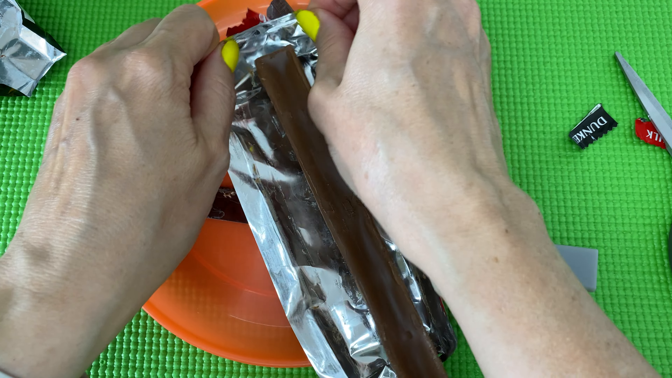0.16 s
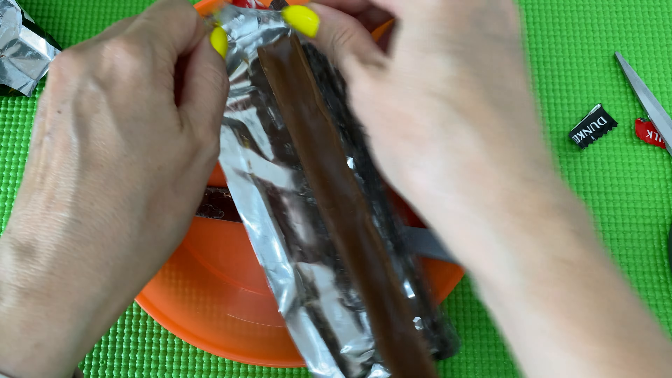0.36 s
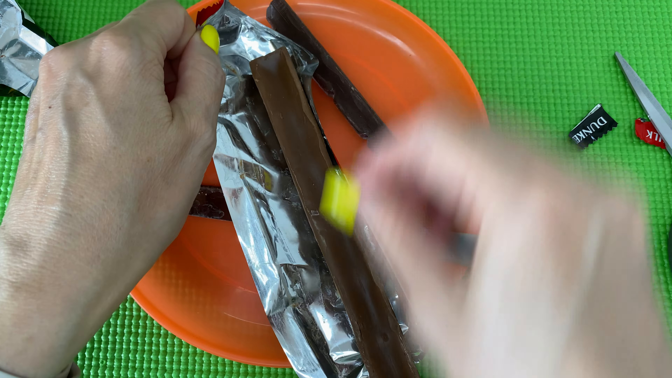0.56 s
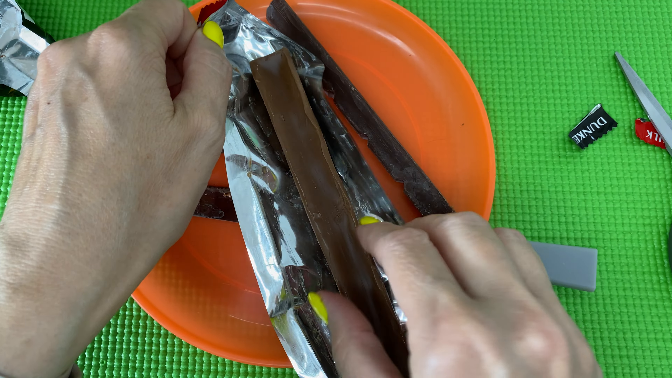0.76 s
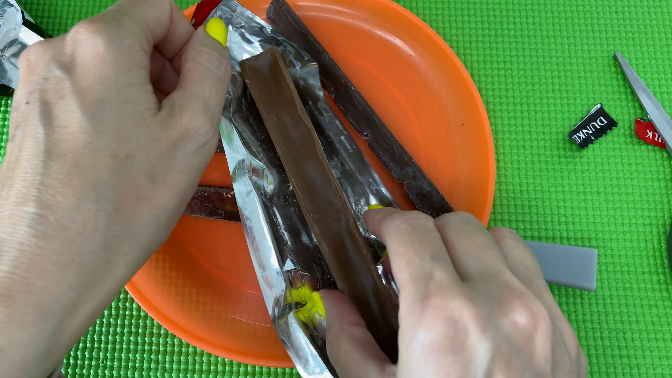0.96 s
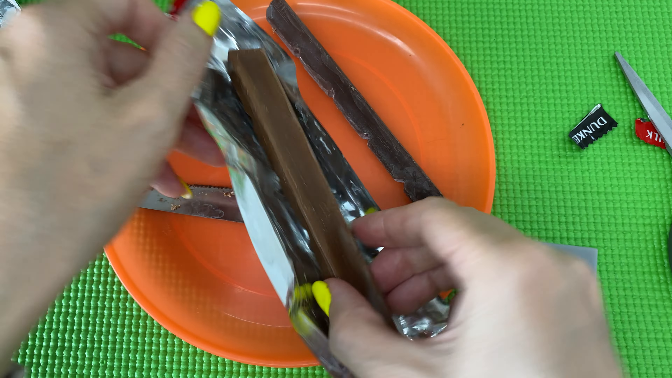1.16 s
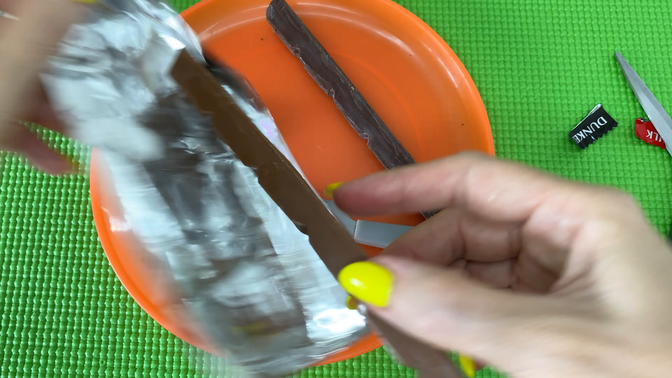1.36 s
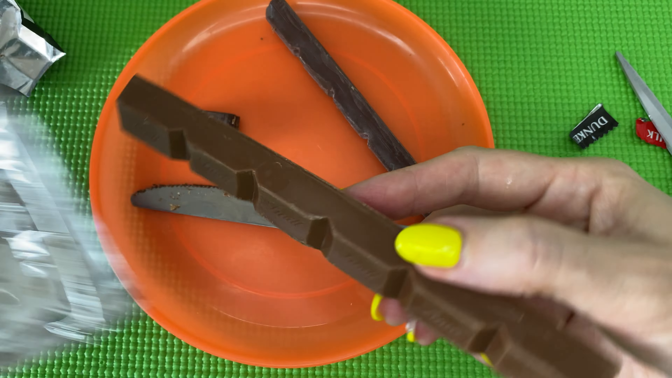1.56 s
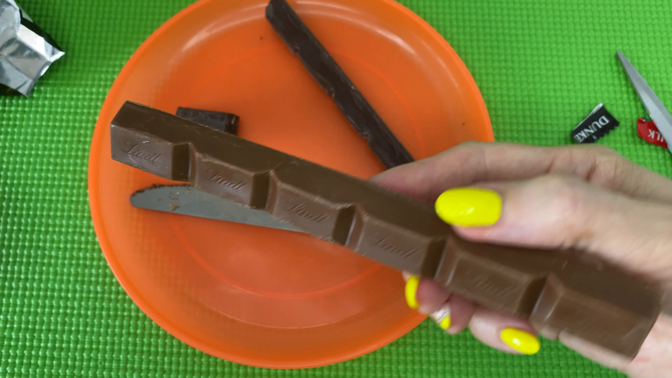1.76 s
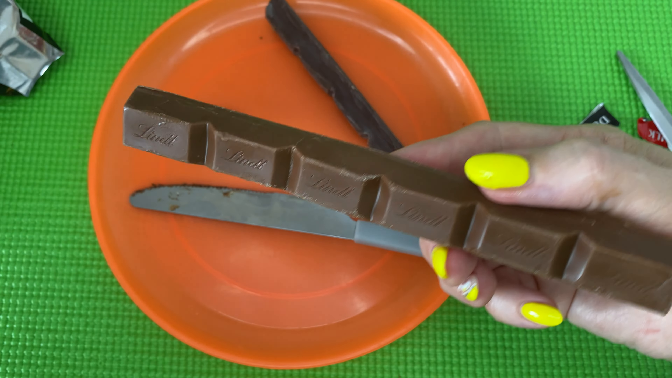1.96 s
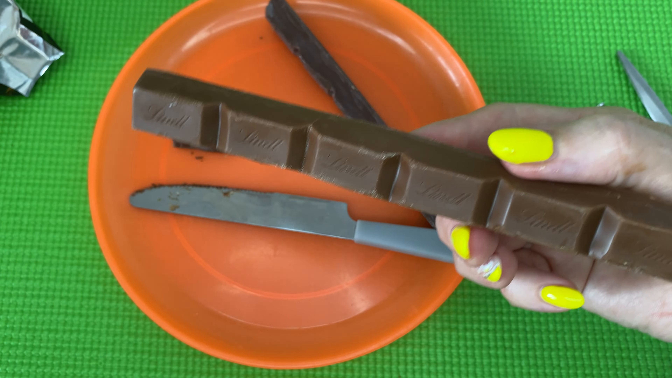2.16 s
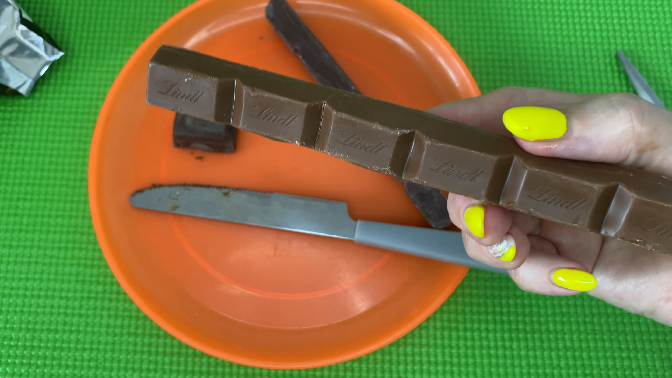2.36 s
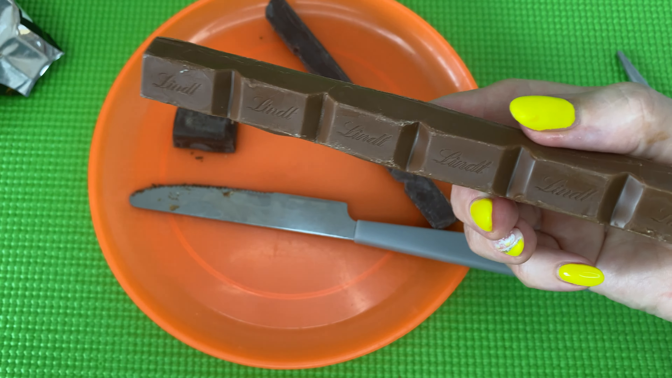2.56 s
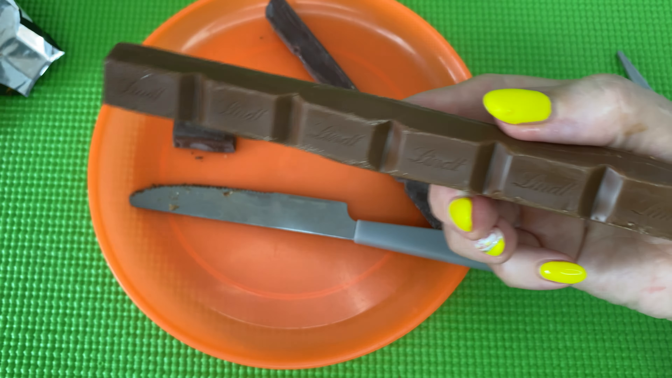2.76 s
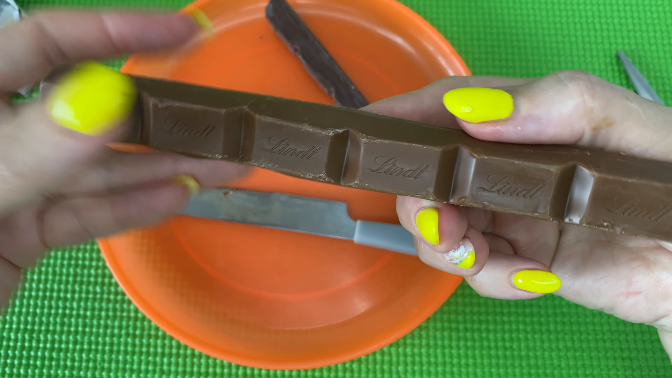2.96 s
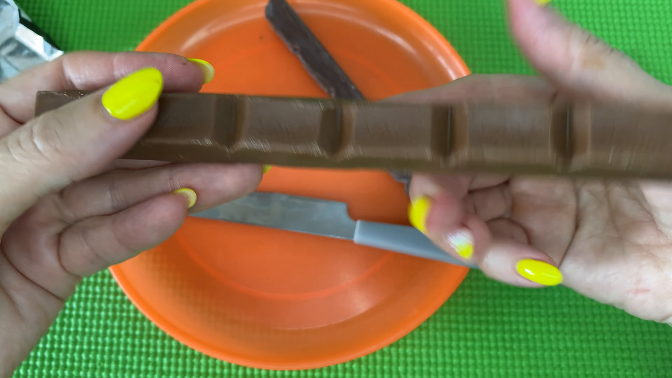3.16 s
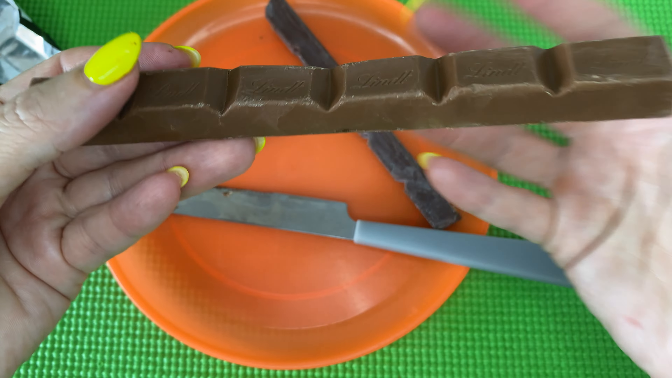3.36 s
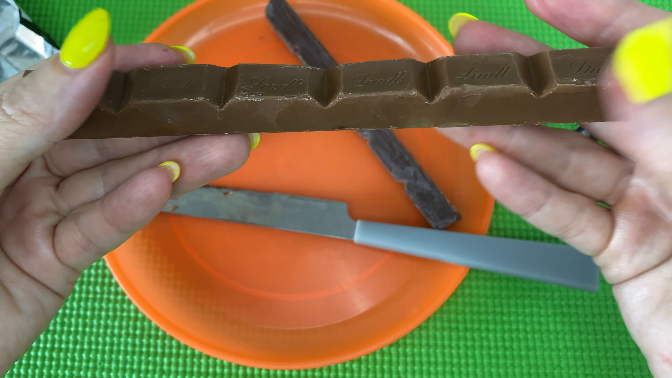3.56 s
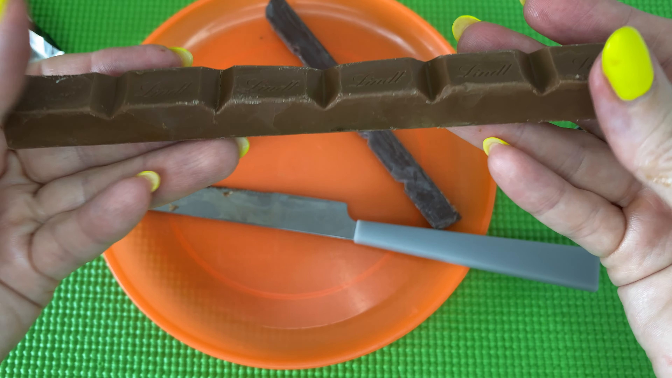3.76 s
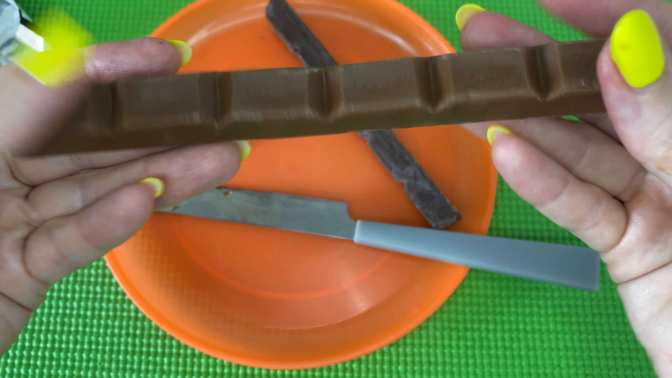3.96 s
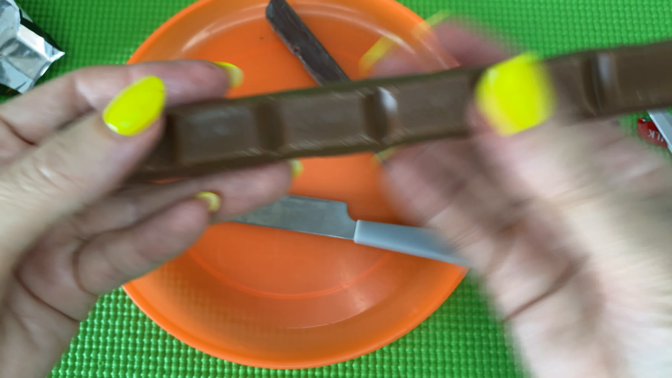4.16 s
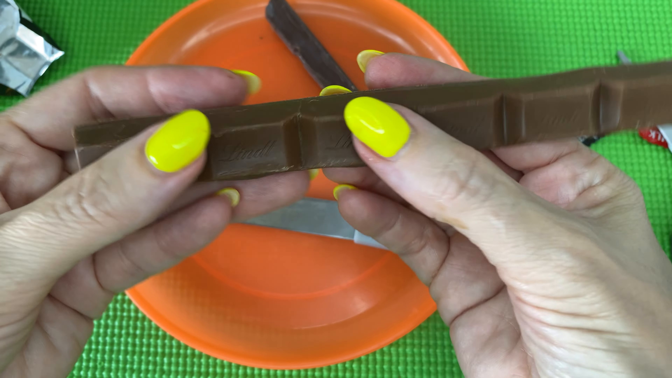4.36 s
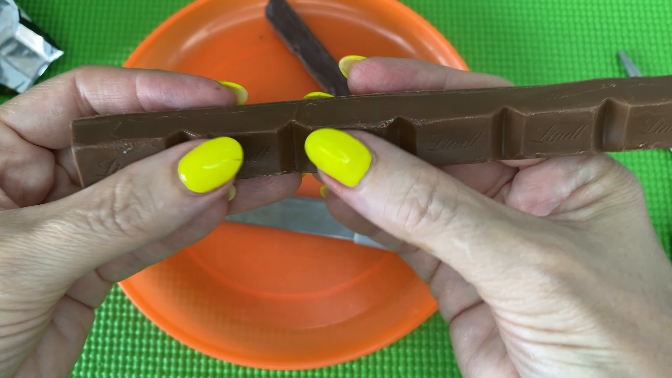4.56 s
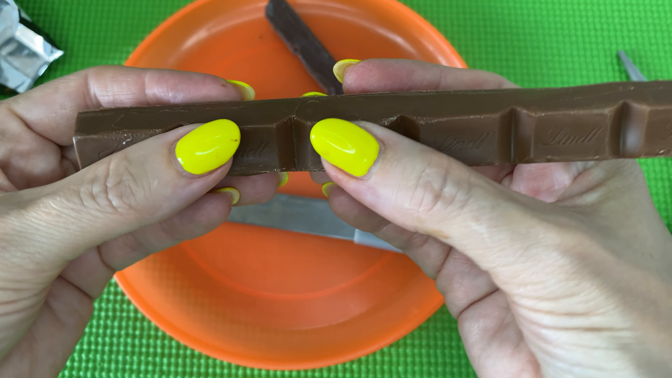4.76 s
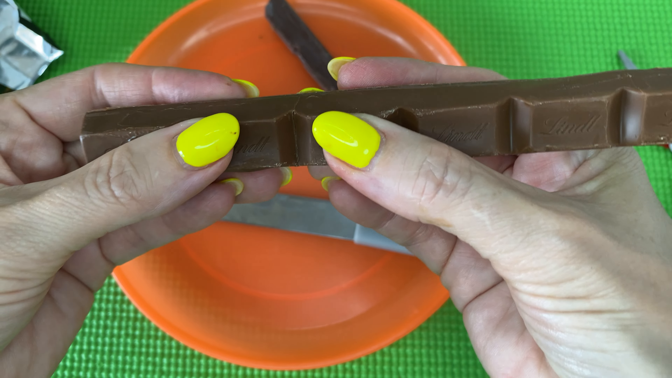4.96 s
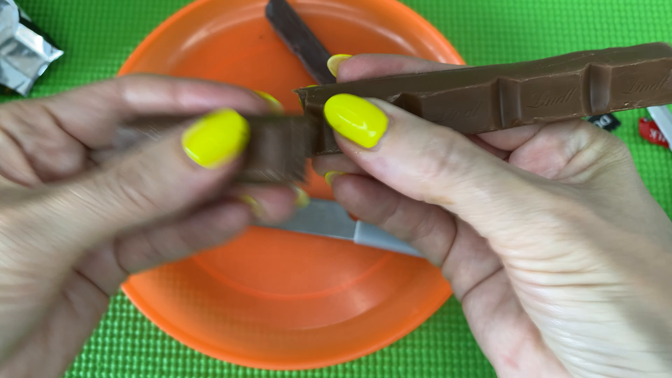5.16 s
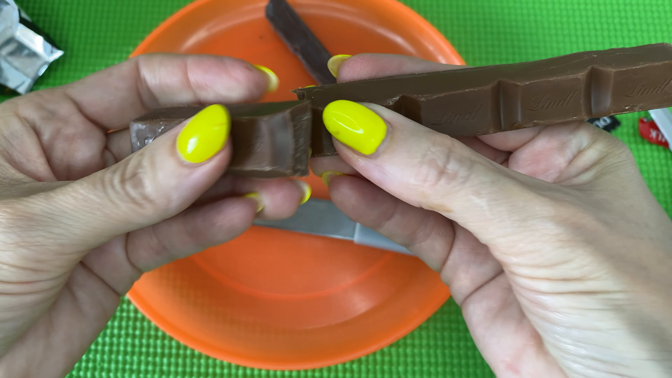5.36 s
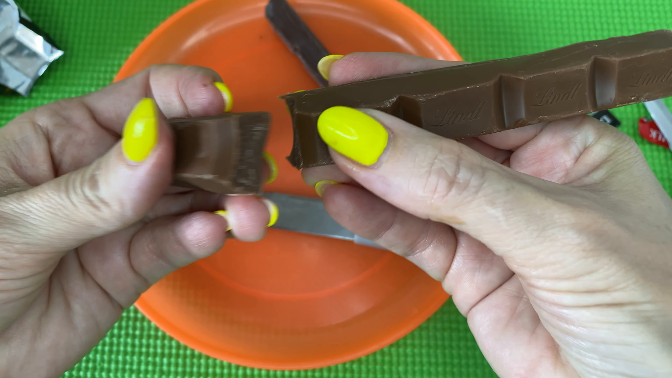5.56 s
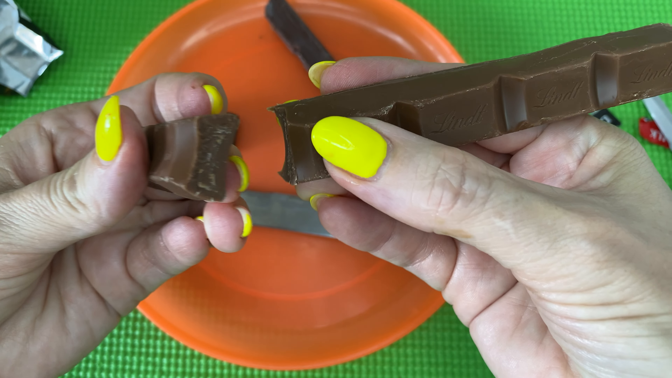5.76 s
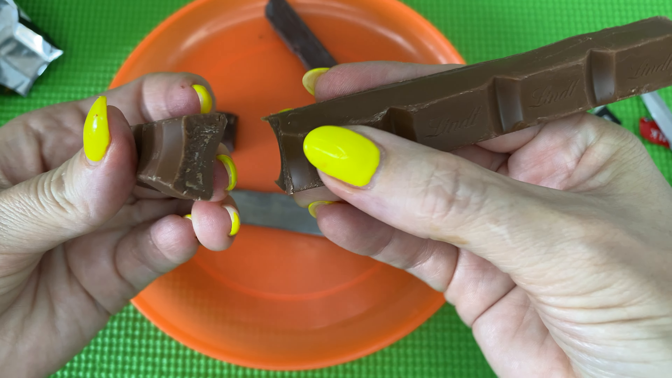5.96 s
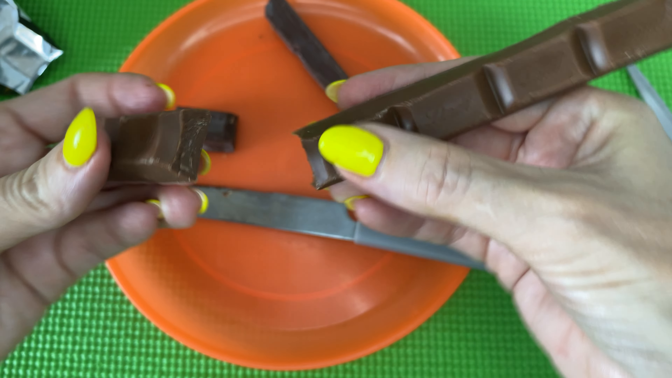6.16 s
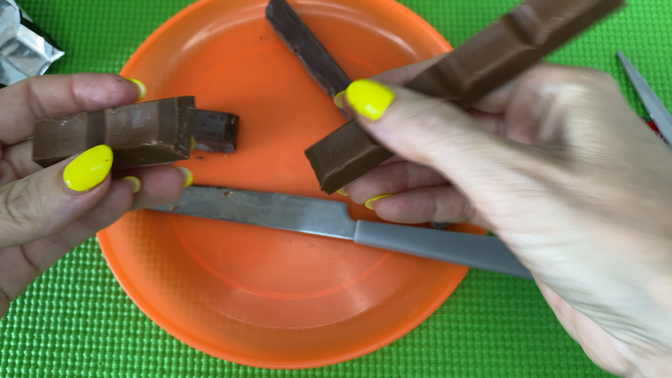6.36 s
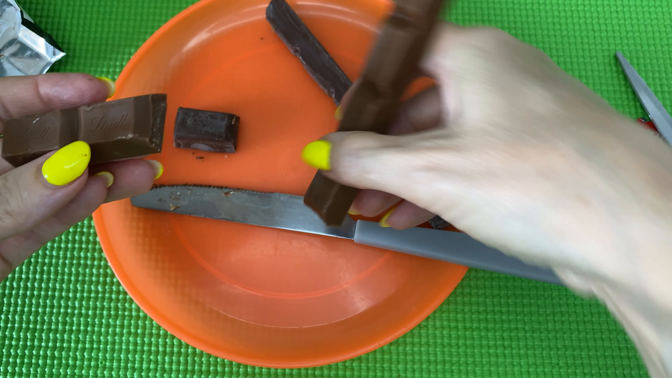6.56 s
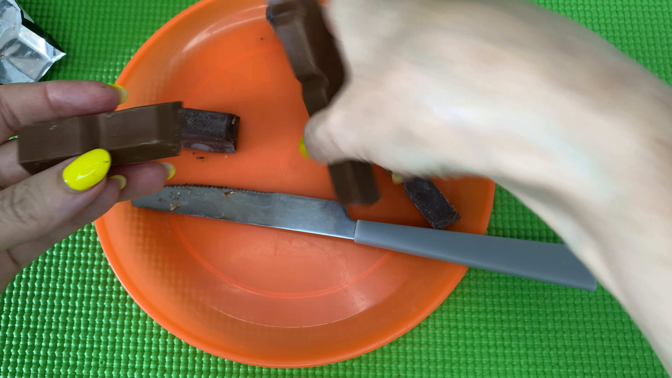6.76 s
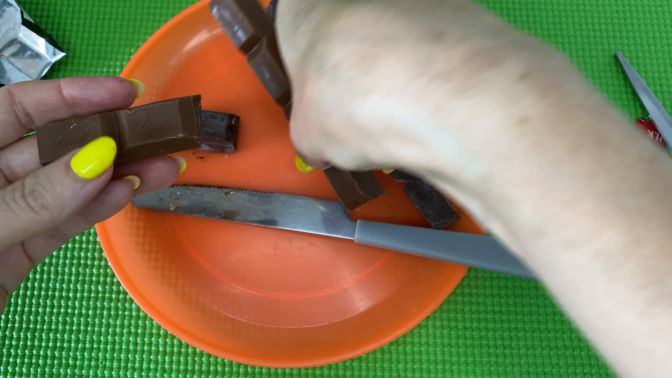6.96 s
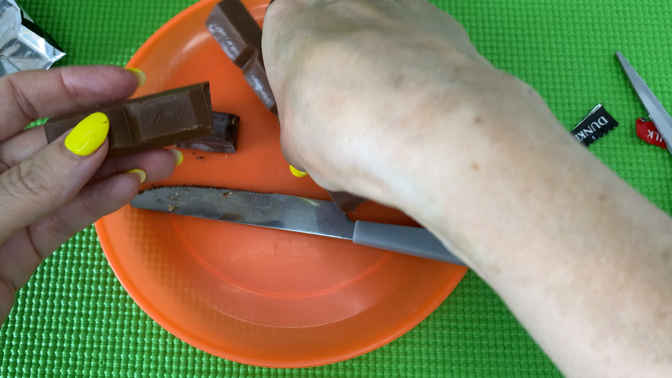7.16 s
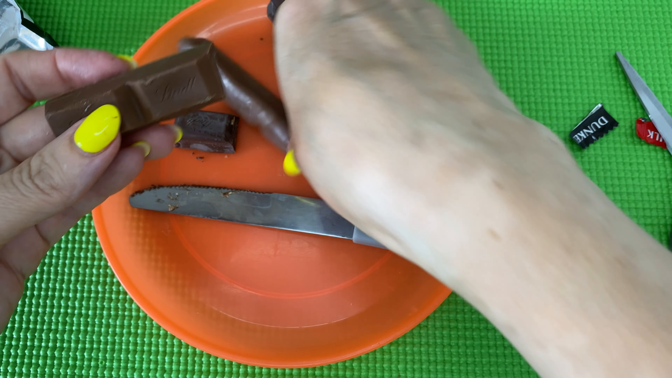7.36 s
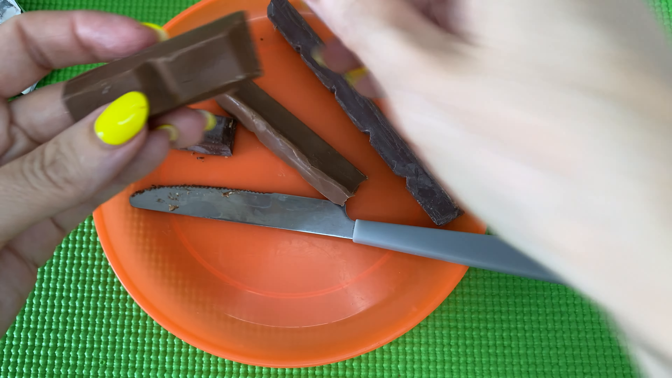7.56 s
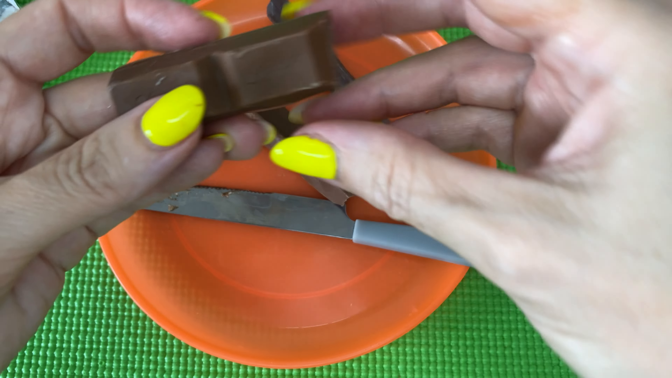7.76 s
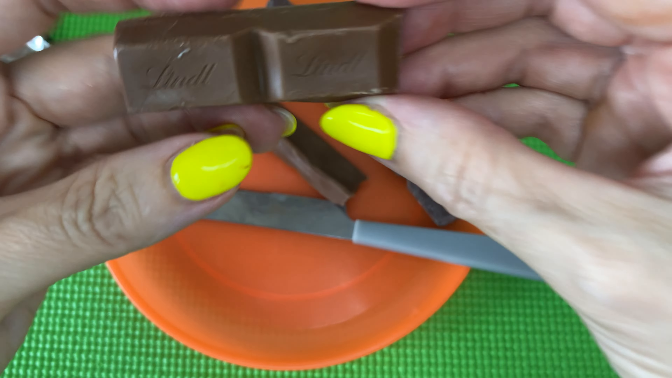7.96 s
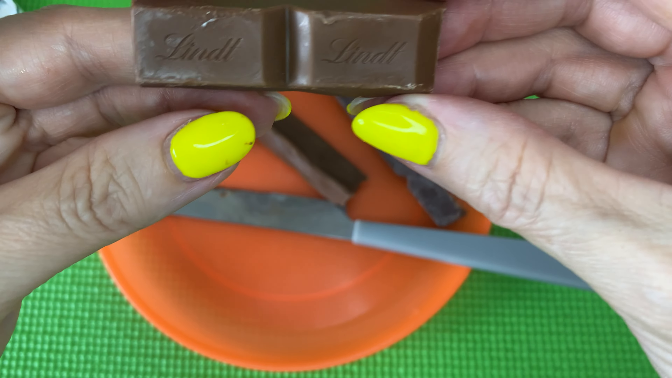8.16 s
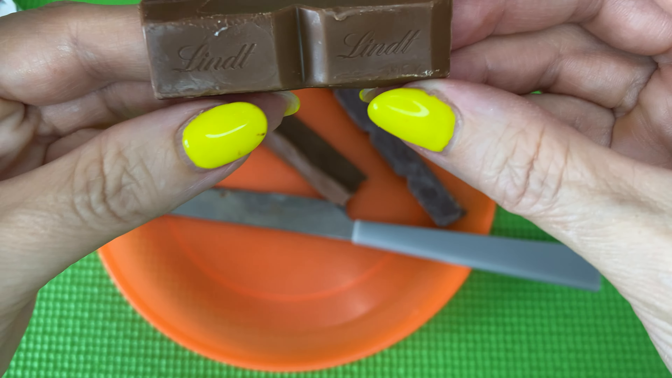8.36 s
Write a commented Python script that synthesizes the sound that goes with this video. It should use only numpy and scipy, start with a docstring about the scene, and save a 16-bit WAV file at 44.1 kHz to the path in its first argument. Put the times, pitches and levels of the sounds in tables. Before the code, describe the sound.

Foil pops and rustles at once, loud, dense and crisp, with brief gaps, then thins to occasional light crinkles. Near silence follows: low room hiss, wavering rumble, barely audible skin on chocolate. Midway comes a small crisp break with skin scuffs. Near the end a light tap precedes a rapid clatter of a bar settling on a thin plastic plate. Close phone pickup, short room tail.

```python
"""In a small furnished room, hands close to a phone peel a foil wrapper off a chocolate bar.
They turn the bar, snap a piece off and lay the rest on a plastic plate, where it rattles to rest.
Each buckling crease is a few-cycle pop with a bright spit of noise; filtered grains make the rustle and crumbs.
Damped modes ring the plate, swells of noise rub skin on chocolate, and low damped swings jolt the table.
The room adds a diffuse tail to foil, bar and plate, over steady hiss and a rumble that swells and wavers."""
import sys
import numpy as np
from scipy import signal
from scipy.fft import rfft, irfft
from scipy.io import wavfile

SR = 44100
rng = np.random.default_rng(int(sys.argv[2]) if len(sys.argv) > 2 else 0)


def inscribe(sig):
    """Save sig as 16-bit PCM at rate SR to the path in sys.argv[1].

    A 1-D sig is mono; a 2-D sig holds one channel per row.
    Samples are clipped to [-1, 1] before scaling.
    """
    pcm = np.round(np.clip(np.atleast_2d(sig).T, -1, 1) * 32767)
    wavfile.write(sys.argv[1], SR, pcm.astype(np.int16))


N = 370649


def undb(db):
    """Amplitude ratio: 20 dB is a factor of ten."""
    return 10 ** (np.asarray(db) / 20)


def unit(x):
    """Normalization to an rms of 1."""
    return x / np.sqrt(np.mean(x ** 2))


def noise(count=N):
    """White noise: equal power at all frequencies on average."""
    return rng.standard_normal(count)


def band(x, low_hz, high_hz):
    """Band-pass filtering: only the range between two cutoffs is passed."""
    edges_hz = [low_hz, min(high_hz, .45 * SR)]
    return signal.sosfilt(signal.butter(2, edges_hz, "band", fs=SR, output="sos"), x)


def add(out, start_s, x):
    """Superposition: x is summed into out from its start time."""
    i = int(start_s * SR)
    out[i:i + len(x)] += x[:N - i]


def level_curve(rows):
    """Level interpolated in dB between the points of a table, silent outside them."""
    start_s, level_db = np.transpose(rows)
    return undb(np.interp(np.arange(N) / SR, start_s, level_db, left=-200, right=-200))


def pops(rows, cycles, sweep_db, buzz_db, buzz_ms, spit_ms, linger_db, linger_ms):
    """Buckling impulse: a damped swing, a dispersive falling sweep, a noisy buzz and a bright spit."""
    out, t = np.zeros(N), np.arange(1500) / SR
    for start_s, pop_db, pitch_hz, spit_db in rows:
        buzz_noise, spit_noise = noise(len(t)), noise(len(t))
        side = np.sign(buzz_noise[0])  # random polarity
        age = t * pitch_hz / cycles  # the swing's envelope peaks at age 1
        swing = age * np.exp(1 - age) * np.sin(2 * np.pi * pitch_hz * t)

        # slow bending waves arrive later, so the pitch falls; large, low patches show it most
        phase = 2 * np.pi * 2.2 * pitch_hz * .0005 * np.log(1 + t / .0005)
        sweep = undb(sweep_db) * 1600 / pitch_hz * np.sin(phase) * np.exp(-t / .0016)

        buzz = undb(buzz_db) * unit(band(buzz_noise, 0.3 * pitch_hz, 2.0 * pitch_hz))
        buzz = buzz * np.exp(-t * 1000 / buzz_ms) * np.minimum(age, 1)

        # the spit decays in two stages, quick and lingering
        fade = np.exp(-t * 1000 / spit_ms) + undb(linger_db) * np.exp(-t * 1000 / linger_ms)
        spit = fade * unit(band(spit_noise, 5800, 14000))
        add(out, start_s, undb(pop_db) * (side * (swing + sweep) + buzz) + undb(spit_db) * spit)
    return out


def grains(rate_per_s, scatter_db, low_hz, high_hz, smear_ms):
    """Shot noise: sparse random ticks of uneven size, each decaying exponentially in one band."""
    when, size = rng.random((2, N))
    heights = undb(scatter_db * np.minimum(-np.log(size + 1e-9), 3.5))
    ticks = (when < rate_per_s / SR) * heights
    fading = signal.lfilter([1], [1, -np.exp(-1000 / (smear_ms * SR))], ticks)
    return unit(band(fading * noise(), low_hz, high_hz))


# the clearest creases of the buckling foil: start_s [s], pop_db [dB], pitch_hz [Hz], spit_db [dB]
CLEAR_CREASES = [(0.0575, -16, 2610, -28), (0.0934, -5.5, 4810, -11), (0.1137, -10, 3360, -33),
                 (0.1255, -20.5, 2940, -31), (0.1316, -18.5, 1676, -39), (0.1839, -8.5, 2700, -26),
                 (0.1871, -6, 3510, -10.5), (0.2259, -24, 3170, -27), (0.2373, -27, 2520, -38),
                 (0.2817, -25, 3470, -60), (0.3018, -24, 4500, -30.5), (0.3049, -21.5, 2640, -44),
                 (0.32, -33.5, 1340, -32), (0.3274, -24, 2720, -57), (0.3458, -22.5, 2710, -33),
                 (0.3725, -27, 2470, -46), (0.3777, -10.5, 5750, -40), (0.3838, -12, 2275, -14),
                 (0.3877, -7.5, 4460, -9.5), (0.4145, -23, 2700, -44), (0.4305, -22, 4350, -35),
                 (0.4396, -15.5, 3280, -39), (0.4447, -13.5, 3910, -32), (0.4538, -10, 2750, -11.5),
                 (0.6772, -36.5, 3210, -57), (0.6883, -44.5, 990, -35), (0.7099, -26.5, 3500, -30),
                 (0.7427, -20.5, 3190, -23.5), (0.7684, -21, 3830, -19), (0.8087, -24, 4970, -45),
                 (0.8215, -10.5, 3750, -17), (0.8515, -7.5, 6080, -46), (1.0345, -13, 3810, -11),
                 (1.036, -10.5, 4880, -10.5), (1.0676, -21, 2380, -13.5), (1.0841, -21, 5430, -37),
                 (1.094, -20, 5160, -24), (1.0964, -14, 4790, -21), (1.0997, -14.5, 4210, -31),
                 (1.1035, -17, 4770, -35), (1.1148, -21.5, 4730, -37), (1.1342, -31, 2150, -32),
                 (1.1608, -34, 4200, -41), (1.2368, -34.5, 1370, -39), (1.262, -25, 2230, -53),
                 (1.2776, -30.5, 1810, -60), (1.2998, -46.5, 1020, -60), (1.3369, -31, 4270, -64),
                 (1.355, -24, 2210, -44), (1.3734, -31.5, 1540, -55), (1.4079, -33.5, 4140, -32),
                 (1.4099, -35.5, 1310, -39), (1.4247, -26, 1610, -28.5), (1.4385, -25, 3760, -28),
                 (1.4529, -35, 1570, -41), (1.4759, -42, 1450, -41), (1.5028, -28.5, 1580, -44),
                 (1.5147, -31.5, 3050, -57), (1.6397, -32, 3690, -49.5), (1.6498, -47, 1140, -62),
                 (1.9173, -50, 2605, -47), (1.9829, -54, 2720, -59), (2.0303, -51, 3360, -52),
                 (2.0408, -51, 4480, -50), (2.1268, -44, 3760, -59), (2.1455, -52, 5820, -43.5),
                 (2.3493, -40, 3520, -50), (2.359, -45.5, 1640, -41.5), (2.3897, -54, 2855, -52),
                 (2.475, -52, 5340, -59)]


def foil():
    """Snap-through buckling: clear and lesser creases each release a pop and a spit."""
    return pops(CLEAR_CREASES + lesser_creases(), cycles=0.81, sweep_db=1.0, buzz_db=-9.5, buzz_ms=2.2,
                spit_ms=0.55, linger_db=-17, linger_ms=4.9)


# how hard the foil is worked, one list for each spell of handling: start_s [s], level_db [dB]
HANDLING = [
    [(0, -43.5), (.09, -48.5), (.17, -50), (.27, -67), (.31, -51), (.42, -42), (.52, -54), (.56, -71)],
    [(.65, -78.5), (.68, -52.5), (.75, -47), (.8, -59.5), (1.03, -55), (1.08, -44), (1.19, -53.5),
     (1.31, -59), (1.5, -55.5), (1.55, -73), (1.6, -77), (1.635, -62), (1.72, -78)],
    [(1.9, -74.5), (1.93, -62.5), (2.0, -75), (2.045, -64), (2.085, -72.5), (2.14, -62), (2.2, -81.5),
     (2.28, -68.5), (2.33, -71.5), (2.4, -64), (2.45, -75.5), (2.55, -85)],
]
LESSER_PER_S = 45  # chance creases
LESSER_DB, LESSER_SCATTER_DB = 10.5, 0.5  # over the handling level, and scale of the random excess
LESSER_HZ, LESSER_OCTAVES = 2660, 0.72  # usual pitch and its spread
LESSER_SPIT_DB, SPIT_SPREAD_DB = -9.5, 5.0  # spit relative to the pop
SHEEN_DB = -4  # treble of the rustle relative to its body


def lesser_creases():
    """Random point process: small pops at chance moments, scaled by how hard the foil is worked."""
    rows = []
    window_s = 1.5  # draws past the end of a spell are dropped
    count = int(LESSER_PER_S * window_s)
    for spell in HANDLING:
        spell_s, spell_db = np.transpose(spell)
        when, size = rng.random((count, 2)).T
        pitch, spit = rng.standard_normal((count, 2)).T
        start_s = spell_s[0] + window_s * when
        excess_db = LESSER_DB - LESSER_SCATTER_DB * np.log(size + 0.025)
        pop_db = np.interp(start_s, spell_s, spell_db) + excess_db
        pitch_hz = np.clip(LESSER_HZ * 2 ** (LESSER_OCTAVES * pitch), 900, 6000)
        spit_db = pop_db + LESSER_SPIT_DB + SPIT_SPREAD_DB * spit
        creases = np.transpose([start_s, pop_db, pitch_hz, spit_db])
        rows += list(creases[start_s < spell_s[-1]])
    return rows


def rustle():
    """Crackling noise: many tiny creases fuse, in patches of foil of several sizes."""
    body = (0.27 * grains(120.2, 3.6, 200, 520, 3.8)
            + .5 * grains(200, 3.087, 900, 1655, 2.1)
            + grains(400, 3., 1500, 3600, 2.)
            + .7 * grains(600, 2.5, 3400, 6500, 2.))
    sheen = grains(900, 2.5, 6000, 14000, 2.)
    effort = sum(level_curve(spell) for spell in HANDLING)
    return effort * (unit(body) + undb(SHEEN_DB) * sheen)


# nails ticking on the bar, the snap, the bar touching the plate:
# start_s [s], pop_db [dB], pitch_hz [Hz], spit_db [dB]
BAR_TICKS = [(3.5281, -56, 4500, -64.5), (4.9445, -57, 3965, -49.5), (5.0764, -60.5, 3940, -62),
             (5.112, -60, 3700, -72), (5.1333, -39.5, 2980, -38.5), (5.1355, -38, 2870, -44),
             (5.1382, -32.5, 2840, -32.5), (7.1332, -57.5, 1460, -62.5), (7.1705, -40, 1727, -57.5),
             (7.1807, -52.5, 2072, -73.5)]


def bar():
    """Impact and brittle fracture: short pops for the ticks, the snap and the first touch of the plate."""
    return pops(BAR_TICKS, cycles=1.254, sweep_db=-24.0, buzz_db=-7, buzz_ms=2.95,
                spit_ms=1.04, linger_db=-45.0, linger_ms=10.0)


# the bar dropped on the plate, rattling to rest: start_s [s], pop_db [dB], spit_db [dB]
DROP_KNOCKS = [(7.3521, -13.5, -32.5), (7.3549, -26, -30), (7.358, -17, -26.5), (7.3605, -20, -32),
               (7.3709, -14.5, -25), (7.3753, -14.5, -25), (7.3808, -10, -10), (7.3875, -23, -35),
               (7.3924, -16.5, -33.5), (7.3963, -26, -29), (7.4045, -25, -39), (7.4095, -29, -46)]
DROP_HZ, DROP_OCTAVES = 1790, .16  # pitch of the knocks and its spread


def drop():
    """Repeated impact: the bar strikes the plate in a quick run of knocks of slightly varied pitch."""
    rows = []
    for start_s, pop_db, spit_db in DROP_KNOCKS:
        pitch_hz = DROP_HZ * 2 ** (DROP_OCTAVES * rng.standard_normal())
        rows.append((start_s, pop_db, pitch_hz, spit_db))
    return pops(rows, cycles=0.95, sweep_db=-9, buzz_db=-2.5, buzz_ms=1.96,
                spit_ms=0.2, linger_db=-18.0, linger_ms=4.2)


# ringing modes of the plate: pitch_hz [Hz], level_db [relative dB], t60_s [s]
PLATE_MODES = [(1473, -19, 0.042), (1721, -6.5, 0.045), (2060, -9, 0.04), (2487, -7.5, 0.056),
               (3100, -1.5, 0.059)]
RING_DB, RATTLE_DB = -44.5, -44.5  # gains on the ringing and on the rattle


def plate(blows):
    """Modal resonance: blows ring damped modes, and stored energy drives a broad, dying rattle."""
    t = np.arange(8000) / SR
    ring = sum(undb(level_db) * np.sin(2 * np.pi * pitch_hz * t) * 1000. ** (-t / t60_s)
               for pitch_hz, level_db, t60_s in PLATE_MODES)
    blows = band(blows, 860, 17400)  # a small plate radiates little bass
    stored = signal.lfilter([1], [1, -np.exp(-1 / (0.018 * SR))], blows ** 2)  # energy left in the plate
    low_rattle = unit(band(noise(), 270.0, 870))
    high_rattle = unit(band(noise(), 1900, 5840))
    rattle = np.sqrt(stored) * unit(0.65 * low_rattle + high_rattle)
    ringing = signal.fftconvolve(blows, ring)[:N]
    return blows + undb(RING_DB) * ringing + undb(RATTLE_DB) * rattle


CRUMBLE_S, CRUMBLE_DB, CRUMBLE_FADE_S = 5.14, -60, 0.046  # start, level, time constant


def crumble():
    """Granular noise: fine grains of crumbs falling after the snap, fading exponentially."""
    age = np.arange(N) / SR - CRUMBLE_S
    fade = (age > 0) * np.exp(-np.abs(age) / CRUMBLE_FADE_S)
    crumbs = grains(900, 2.1, 2400, 6100, 2.) + undb(-6.5) * grains(900, 2.5, 8500, 14000, 2.)
    return undb(CRUMBLE_DB) * fade * crumbs


# fingertips sliding on the bar, a thin high hiss: middle_s [s], level_db [dB], length_s [s]
FINGER_SLIDES = [(3.271, -79, 0.02), (3.362, -77.5, 0.051), (4.39, -75, 0.11), (4.67, -71, 0.058),
                 (5.25, -70, 0.035), (5.37, -73.5, 0.043), (8.15, -82, .04)]
# skin catching on the bar, a short low scuff: middle_s [s], level_db [dB], length_s [s]
SKIN_SCUFFS = [(3.836, -74.5, 0.021), (5.272, -66, 0.0077), (5.288, -65.5, 0.013), (5.315, -77.5, 0.065)]
SLIDE_HZ, SCUFF_HZ = 11600, 1840


def rubs(rows, center_hz):
    """Friction noise: bell-shaped swells of hiss, relatively broader in band when high."""
    t, spread = np.arange(N) / SR, 1.05 + center_hz / 36000
    swells = sum(undb(level_db) * np.exp(-(2 * (t - middle_s) / length_s) ** 2)
                 for middle_s, level_db, length_s in rows)
    return swells * unit(band(noise(), center_hz / spread, center_hz * spread))


# dull jolts through hands and table, each with a higher knock on top:
# start_s [s], level_db [dB], pitch_hz [Hz], t60_s [s], knock_db [dB]
TABLE_JOLTS = [(0.111, -48, 153, 0.029, -35), (0.39, -40, 175, 0.032, -42), (0.455, -36.5, 151, 0.054, -45),
               (2.362, -46, 177, 0.12, -44.5), (5.141, -30.5, 125.4, 0.03, -46.5),
               (7.357, -29.5, 132, 0.1, -36), (7.38, -38, 202, 0.21, -45)]
OVERTONE, OVERTONE_T60_S = 2.4, 0.022  # knock pitch over swing pitch, knock decay


def jolts():
    """Damped oscillation: a low swing starts softly and dies quickly under a short knock."""
    out, t = np.zeros(N), np.arange(8000) / SR
    for start_s, level_db, pitch_hz, t60_s, knock_db in TABLE_JOLTS:
        onset = np.minimum(t * pitch_hz, 1)  # rises over one cycle
        swing = np.sin(2 * np.pi * pitch_hz * t) * onset * np.exp(-np.log(1000) * t / t60_s)
        knock = np.sin(2 * np.pi * OVERTONE * pitch_hz * t) * np.exp(-np.log(1000) * t / OVERTONE_T60_S)
        add(out, start_s, undb(level_db) * swing + undb(knock_db) * knock)
    return out


# decay of the room by band: low_hz [Hz], high_hz [Hz], level_db [relative dB], t60_s [s]
ROOM_BANDS = [(150.1, 480, 0.5, 0.067), (945, 3500, -17, 0.35), (3500, 4600, -17, 0.24),
              (8000, 20000, -15, 0.2)]


def room(x):
    """Diffuse reverberation: a noise tail builds over a few ms, and each band decays at its own rate."""
    t = np.arange(16000) / SR
    tail = 0
    for low_hz, high_hz, level_db, t60_s in ROOM_BANDS:
        decay = np.exp(-np.log(1000) * t / t60_s) * (1 - np.exp(-t / .004))
        decay = decay / np.sqrt(np.sum(decay ** 2))
        tail = tail + undb(level_db) * band(noise(len(t)), low_hz, high_hz) * decay
    return signal.fftconvolve(x, tail)[:N]


# spectrum of the hiss: pitch_hz [Hz], level_db [relative dB per Hz]
HISS_SPECTRUM = [(120, -31.5), (200, -6), (232, -4.5), (403, -6), (451, -7), (756, -10), (844, -12),
                 (3020, -19.5), (12300, -25), (15000, -32), (16500, -49)]
# level of the deep rumble: start_s [s], level_db [dB]
DEEP_RUMBLE = [(0, -74.5), (1.6, -67), (2.6, -71.5), (3.4, -69.5), (4.7, -75), (5.17, -70.5), (5.27, -53),
               (5.4, -62), (5.52, -57), (6.2, -66.5), (8.41, -69)]
HISS_DB, UPPER_RUMBLE_DB = -72.5, -67.5
WAVER_DB, WAVER_S = 2.73, 0.31  # spread of the random level, time between its points


def floor():
    """Background noise: steady shaped hiss of room and microphone, over a deep rumble
    that swells after the snap and a wavering upper rumble."""
    hz, (pitch_hz, level_db) = np.fft.rfftfreq(N, 1 / SR), np.transpose(HISS_SPECTRUM)
    shape = undb(np.interp(np.log(hz + 1), np.log(pitch_hz), level_db))
    hiss = unit(irfft(rfft(noise()) * shape, N))
    deep = unit(band(band(noise(), 45, 60), 30, 84))
    upper = unit(band(noise(), 64, 160))
    waver = np.interp(np.arange(N) / SR / WAVER_S, np.arange(99), noise(99))
    upper_level = undb(UPPER_RUMBLE_DB + WAVER_DB * waver)
    return undb(HISS_DB) * hiss + level_curve(DEEP_RUMBLE) * deep + upper_level * upper


def scene():
    """Superposition: near sources with their room tail, then the other touches and the floor."""
    near = foil() + rustle() + bar() + plate(drop())
    skin = rubs(FINGER_SLIDES, SLIDE_HZ) + rubs(SKIN_SCUFFS, SCUFF_HZ)
    return (near + room(near) + jolts() + skin + crumble() + floor())[None]


def record(dry):
    """Transducer response: the phone cuts deep bass, lifts its port resonance, saturates and cuts the top."""
    x = signal.sosfilt(signal.butter(8, 43, "high", fs=SR, output="sos"), dry)
    x = x + .3 * band(x, 10500, 14000)  # port resonance
    x = np.tanh(1.149 * x) / 1.139  # the loudest peaks are rounded
    x = signal.sosfilt(signal.butter(3, 15200, fs=SR, output="sos"), x)  # gentle roll-off
    return signal.sosfilt(signal.ellip(8, .2, 60, 16600, fs=SR, output="sos"), x)  # steep top cut


dry = scene()
out = record(dry)
inscribe(out)
```